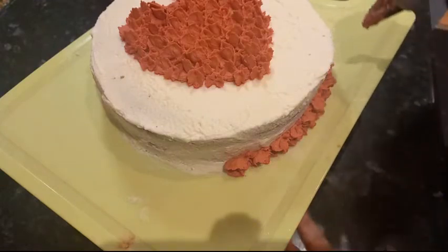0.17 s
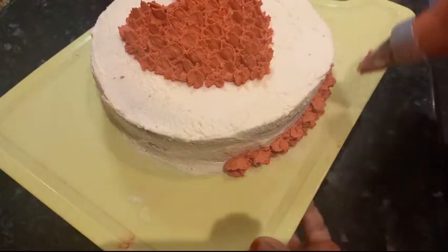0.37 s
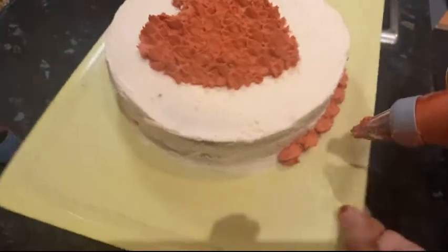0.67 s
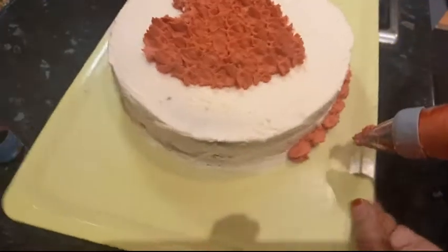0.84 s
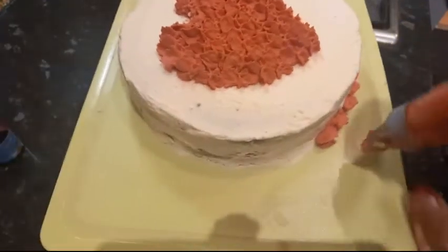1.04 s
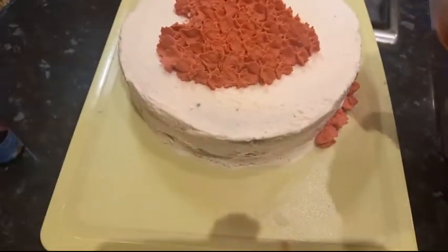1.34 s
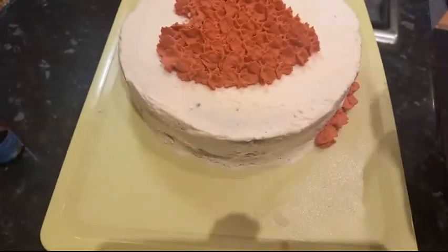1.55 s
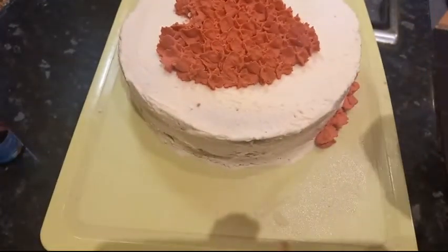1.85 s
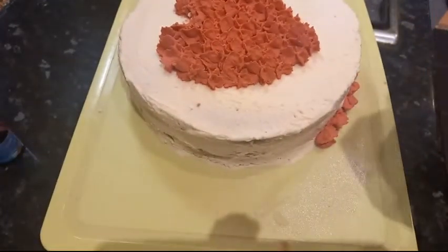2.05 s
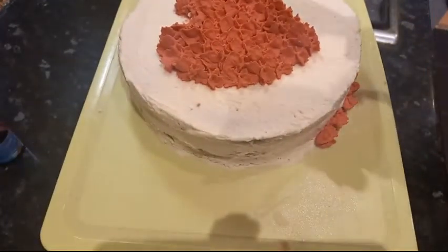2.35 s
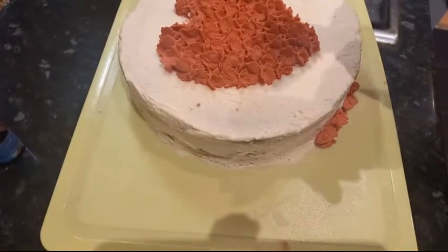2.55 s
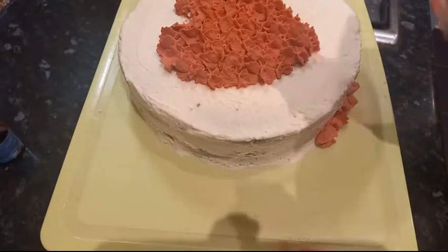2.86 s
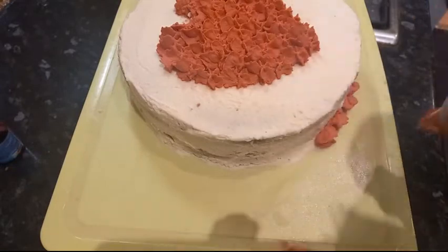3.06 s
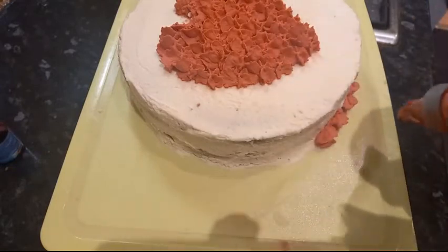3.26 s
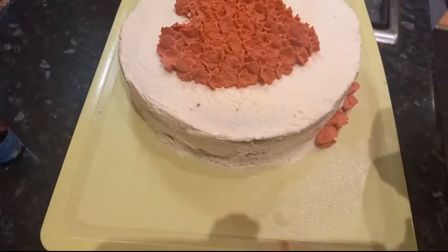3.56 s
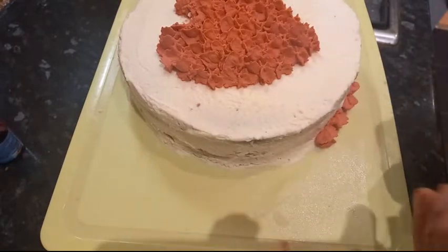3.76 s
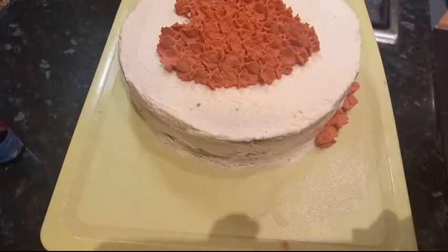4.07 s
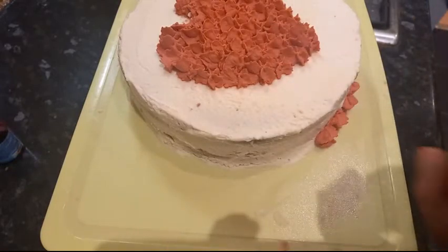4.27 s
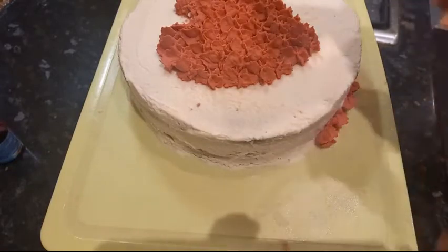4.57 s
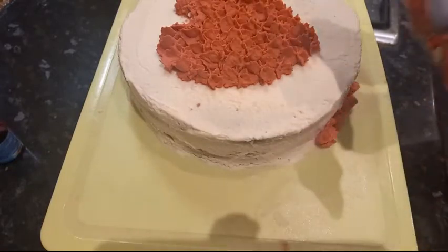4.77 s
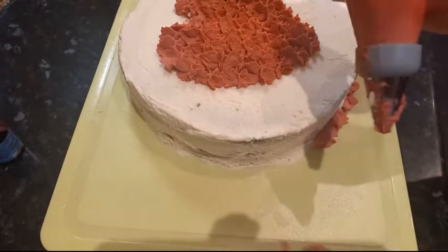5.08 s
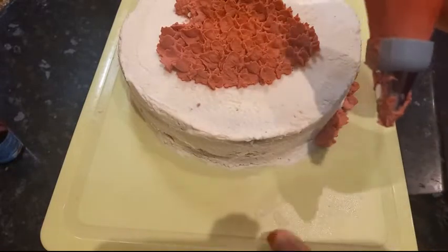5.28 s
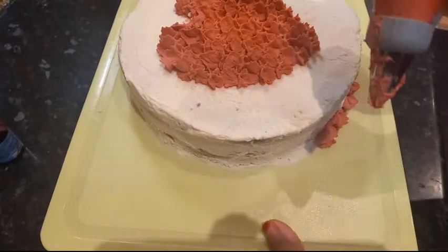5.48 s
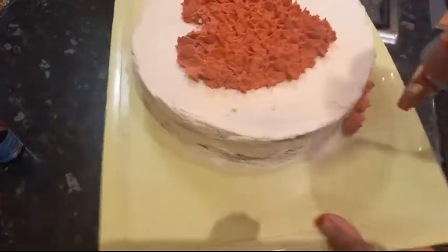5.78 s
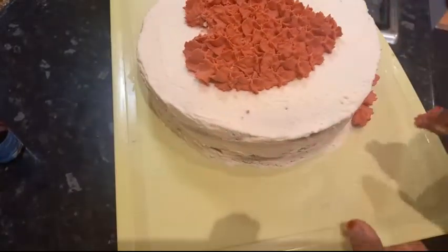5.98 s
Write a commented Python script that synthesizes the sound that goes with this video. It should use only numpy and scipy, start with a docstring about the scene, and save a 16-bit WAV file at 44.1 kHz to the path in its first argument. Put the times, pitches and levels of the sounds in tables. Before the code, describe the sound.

A quiet small kitchen, heard close in stereo: faint unsteady low appliance hum, soft room air and hiss. From 0.2 s a cake tray ticks and scrapes on a stone counter, with the strongest hollow knocks at 0.5-0.65 s and a gritty slide fading by 0.9 s. A dull double thud lands at 1.05 s. Thin plastic film then crinkles, mostly to the right: a dense crackling burst at 1.3-1.6 s trails into scattered ticks to 1.8 s; a short burst at 2.1-2.25 s holds one very sharp snap. Sparse faint ticks follow. The fullest, loudest crumpling runs 3.3-3.55 s, with smaller rustles at 3.7-4.0 s and another crisp cluster at 4.08-4.3 s. Then near silence, with a faint brush around 4.6 s. At 5.25-5.35 s the tray knocks several times, one plastic snap clicks at 5.63 s, and a soft slide dies by 5.8 s, leaving hum.

```python
"""Plastic snaps and crackles, mostly to the right, as a hand twists and squeezes a thin piping bag.
A cake tray knocks and slides on a stone counter; a small kitchen answers while an appliance hums.
Snaps are shaped noise bursts, crackle is thousands of short rings, knocks are ringing modes, and
slides are noise through resonances. The hum is a wandering sine; the rest of the bed is shaped noise."""
import sys
import numpy as np
from scipy import signal
from scipy.fft import rfft, irfft, next_fast_len
from scipy.io import wavfile
from scipy.ndimage import map_coordinates

SR = 44100
rng = np.random.default_rng(int(sys.argv[2]) if len(sys.argv) > 2 else 0)


def generate_wav(sig):
    """Save sig (samples, or channels by samples) to the path in sys.argv[1] as 16-bit PCM at SR."""
    pcm = np.round(np.clip(np.atleast_2d(sig).T, -1, 1) * 32767).astype(np.int16)
    wavfile.write(sys.argv[1], SR, pcm)


def decibels_to_gain(level_db):
    """Convert a level in decibels to a linear amplitude gain (20 dB per decade)."""
    exponent = np.asarray(level_db, float) / 20
    return 10 ** exponent


N = 270774
TIME = np.arange(N) / SR  # seconds

# Level near 81 Hz: the appliance hum, plus the low thud of tray knocks near 0.65 and 1.08 seconds.
# Each row: time in seconds, level in dB before a random waver.
HUM_LEVEL = [(0.0, -83), (0.08, -68.5), (0.31, -76), (0.46, -62), (0.6, -68), (0.65, -57), (0.84, -75.5),
             (1.08, -55), (1.13, -70.5), (1.55, -61.5), (2.02, -78), (2.19, -66), (2.53, -80), (2.62, -64),
             (2.7, -78.5), (3.2, -62), (3.37, -76.5), (3.5, -57), (3.61, -75), (4.34, -56), (5.11, -63.5),
             (5.16, -78), (5.27, -62.5), (5.45, -76.5), (6.05, -65.5), (6.14, -69)]
# Colour of the appliance's low rumble. Each row: frequency in Hz, relative density in dB per Hz.
RUMBLE_COLOUR = [(25, -40), (52, -27.5), (88, -3.5), (124, -11.5), (161, -7), (175, -23), (190, -30),
                 (250, -62), (420, -120)]
# Colour of the deep waver under the hum. Each row: frequency in Hz, relative density in dB per Hz.
WAVER_COLOUR = [(20, -37.5), (38, -18.5), (47, -5.5), (52, 3), (60, -5.5), (75, -6.5), (90, -44),
                (300, -48.5)]
# Colour of the faint whine. Each row: frequency in Hz, relative density in dB per Hz.
WHINE_COLOUR = [(900, -41), (985, 1.0), (1070, -47.0)]
# Colour of the room tone. Each row: frequency in Hz, relative density in dB per Hz.
ROOM_COLOUR = [(100, -23), (170, -8), (206, -5.5), (348, -4.5), (736, -13), (973, -12), (1120, -18),
               (2290, -19.5), (3360, -27), (4520, -33.5), (5900, -32.5), (6700, -23.5), (7360, -38),
               (11000, -38.5), (14300, -59), (22000, -120)]
# Colour of the microphone's own hiss. Each row: frequency in Hz, relative density in dB per Hz.
MIC_HISS_COLOUR = [(3000, -33), (8000, -18.5), (11300, -4.5), (12500, 3), (15200, -4.5), (16000, -4)]
# Stereo likeness of room tone and microphone hiss. Each row: frequency in Hz, correlation from -1 to 1.
ROOM_LIKENESS = [(60, 0.75), (180, 0.59), (550, -0.2), (1650, 0.11), (4970, -0.62), (15000, 1)]
# How fast the kitchen's answer dies. Each row: frequency in Hz, time to fall 60 dB in seconds.
KITCHEN_DECAY = [(200, 0.33), (2000, 0.15), (6000, 0.099), (14000, 0.11)]

# The tray meets the counter. Each row: time in seconds, nominal level in dB, then the relative
# strength in dB of thump, knock and sharpness.
KNOCKS = [(0.207, -43.5, -14, -24, -31), (0.342, -45.5, -22, -28, -19), (0.414, -49.5, -16.5, -19, 0),
          (0.497, -49, -16, 2.5, -9), (0.522, -33.5, -21, -5, -33), (0.6, -23.5, -19, -15, -12),
          (0.617, -47.5, -19, 6, -11), (0.633, -43, 3, -13, -4), (0.639, -35, 0.5, -9, -29),
          (1.046, -29.5, -13.5, -9.5, -34), (1.057, -31, -4, -17, -45.5), (1.086, -42.5, -9, -13, -33),
          (2.659, -61, -9.5, -7, -19), (4.511, -65, 2.5, -0.5, 2), (5.001, -62.5, -17, -0.5, -8),
          (5.242, -31.5, -21.5, -9.5, -10), (5.261, -36, -14.5, -13.5, -13.5), (5.278, -41.5, -15, -5, -9),
          (5.312, -32.5, -23, -12.5, -14), (5.335, -45.5, -13, -10, -16)]
# The tray's ringing modes. Each row: centre frequency in Hz, base level in dB, 60 dB decay in seconds.
TRAY_MODES = [(96, 1.5, 0.22), (152, 6, 0.051), (233, 4.5, 0.075), (289, 2.5, 0.056), (365, -4.5, 0.09),
              (415.2, -1.5, .09), (536.7, 0, 0.12), (626, -5, 0.074), (717, -19, 0.11), (916, -4.5, 0.027),
              (1183, -14, 0.081), (1395, -25.5, 0.055), (1626, -23, 0.069), (1770, -19.5, 0.059),
              (1894, -14.5, 0.087), (2362, -0.5, 0.029), (2470, -24, 0.24), (2670, -13, 0.062),
              (3130, -21.5, 0.15), (3520, -28, 0.21), (4080, -25.5, 0.16)]
RATTLE_DB, RATTLE_GROWS = -9.5, 0.59  # base rattle; dB gained per dB of sharpness
# The tray slides. Each row: start in seconds, end in seconds, rasp at full speed in dB,
# scrape relative to rasp in dB.
SLIDES = [(0.287, .47, -70, 14), (0.361, 0.605, -56.5, 1.5), (0.638, 0.705, -71, 14),
          (0.677, 0.934, -63.5, 6), (4.567, 4.744, -72.5, -4), (5.33, 5.431, -77.5, 10),
          (5.453, 5.62, -74.5, 9.5), (5.513, 5.819, -65.5, 5)]
# Low resonances of the scrape. Each row: frequency in Hz, width in Hz, relative level in dB.
SCRAPE_RESONANCES = [(228, 47, -18), (367, 33, -4.5), (437, 33, -3), (531, 48, -0.5), (675, 79, -9.5),
                     (900, 340, -24.5)]
# High resonances of the rasp, applied twice. Each row: frequency in Hz, width in Hz and relative
# level in dB for a single pass.
RASP_RESONANCES = [(1930, 170, -4), (2295, 150, 0), (2560, 260, -3.5)]
# Colour of the sliding hiss. Each row: frequency in Hz, relative level in dB.
SLIDE_HISS_COLOUR = [(1000, -7), (2800, -13), (3500, 3), (4000, -2), (4350, 3), (4800, 0.5), (5600, 2),
                     (6900, 0), (10600, -15), (16000, -29.5)]
SPEED_GROWS, SLIDE_HISS_DB = 1.15, -3  # rasp amplitude as a power of speed; hiss against rasp

# Grips on the bag. Each row: time of most force in seconds, nominal crackle level in dB, rise in
# seconds per 20 dB, fall in seconds per 20 dB, fullness of the fold in dB.
GRIPS = [(1.125, -63, .13, 0.16, -16), (1.347, -50, 0.05, .1, -2), (1.418, -39, 0.0474, 0.1016, 1),
         (1.49, -54, 0.09, 0.03, -6), (1.53, -48, 0.07, 0.0433, -13.5), (1.69, -56, 0.2, .08, -11),
         (1.6, -62, 0.1, 0.19, 0), (1.8, -71, 0.13, 0.4, -10), (2.04, -64, 0.11, 0.22, -10),
         (2.125, -47, 0.0624, 0.1652, 0), (2.19, -42, .06, 0.06, -2), (2.235, -49, 0.08, 0.0661, -4),
         (2.42, -70, 0.17, .2, -5.5), (2.535, -66, 0.13, .13, -7.5), (2.96, -73, 0.28, .13, -8),
         (3.32, -45, 0.04, 0.31, 0), (3.37, -43, 0.075, 0.1028, 1.5), (3.416, -40, .05, .06, 1.5),
         (3.518, -46, 0.0847, 0.0564, 7), (3.6, -62, 0, 0.01, -3), (3.74, -52, 0.09, 0.1935, -4),
         (3.815, -46, 0.0475, 0.2052, -6), (3.87, -49, 0.0871, 0.1575, 5.5), (4.0, -63, 0.05, .12, 8),
         (4.09, -60, 0.03, 0.1, -6), (4.175, -59, 0.08, 0.12, -10), (4.232, -45.5, 0.06, 0.1047, 2),
         (4.284, -43, 0.0724, 0.0568, 4), (4.36, -74, 0.1, .2, -13), (4.52, -76, 0.04, 0.15, 8),
         (4.633, -67, .15, 0.03, 9), (5.02, -79, 0.04, 0.06, 12), (5.67, -68, .08, 0.03, 0.5)]
FULL_GROWS, HARD_GRIP_DB = 0.3, -44.5  # fullness gained per dB of grip; level of a hard grip
# Where the hands hold the bag. Each row: time in seconds, left over right in dB, relative brightness
# in dB as the hands let treble through.
BAG_SIDE = [(0.9, -1, -3), (1.345, -3.5, -8), (1.42, -1, 5), (1.55, -2.5, -6), (1.7, -4, 1.5),
            (2.0, -6, -6), (2.19, -2, 7), (2.4, -0.5, -10), (2.6, 0, -11), (3.2, -6, -4.5), (3.33, -4, 0.5),
            (3.5, -3, -3), (3.75, -2, -5), (3.82, -3.5, -1.5), (4.0, -6, -6), (4.3, -3.5, -1.5),
            (4.52, 2.5, -12.5), (5.0, 2, -2.5), (5.7, 3.5, 9)]
# Creases that stand out, loud or alone. Each row: time in seconds, nominal peak in dB, lows and
# highs relative to the peak in dB, left over right in dB.
CLEAR_CREASES = [(0.9971, -54, -21.5, -20, -7.5), (1.0907, -46.5, -23, -16, 1),
                 (1.1263, -47.5, -28, -15, -4.0), (1.3319, -38.5, -16, -15, -5),
                 (1.3487, -34, -25.5, -17, -2.5), (1.3798, -34, -19, -4.5, -3.5),
                 (1.398, -25, -27, -12, -4.0), (1.4054, -28, -21.5, -11, -3), (1.418, -26, -22, -12, -1.0),
                 (1.4224, -26, -21, -10, -0.5), (1.4282, -22, -28, -14.5, -1.0),
                 (1.4477, -27, -20, -17, -2.0), (1.452, -31, -23, -14, -1.0), (1.5153, -23, -37, -16.5, -2),
                 (1.5329, -29, -34, -13, -4), (1.5634, -25.5, -28, -15, -9),
                 (1.6234, -35, -34, -15.5, -1.0), (1.6561, -41, -36, -16, -6.5),
                 (1.6646, -38, -30, -19, -3.0), (1.6797, -41, -26, -6.5, -7.5),
                 (1.6921, -30.5, -33, -16, -10), (1.7191, -32.5, -30.5, -18.5, -9.5),
                 (1.7404, -43, -20, -3, -5.0), (1.7651, -27.5, -48, -19, -8.5),
                 (1.8375, -46.5, -32, -17.5, -11), (1.8637, -57, -25, -6, -5),
                 (1.8901, -45, -38, -13.5, -12), (1.9954, -48.5, -38, -26, -5),
                 (2.063, -39.5, -21.5, -14.5, -5), (2.0924, -41, -24.5, -8, -4.0),
                 (2.11, -34, -22, -14, -3.0), (2.1367, -33, -24, -10, -3.0), (2.155, -30, -20.5, 5, -1.5),
                 (2.1873, -15, -36, -9.5, -11.0), (2.1899, -22, -30.5, -6, 0),
                 (2.2296, -31, -20.5, -13.5, 3), (2.362, -52.5, -12, -19, -0.5),
                 (2.406, -49.5, -20, -18, 1.0), (2.4183, -43, -26, -24.5, 6.5),
                 (2.5133, -50, -15, -22, 0.0), (2.5336, -53, -21, -21.5, -1), (2.615, -54, -10, -21.5, -2),
                 (2.7584, -60, -15.5, -13.5, -0.5), (2.8818, -52.5, -20, -20, 2), (2.93, -57, -20, -19, -2),
                 (3.2176, -54.5, -25, -23, -6.0), (3.25, -48, -13.5, -16, -5.5),
                 (3.3119, -20, -29, -15.5, -5.5), (3.3342, -30.5, -18, -15, -4.0),
                 (3.3597, -27.5, -21, -12.5, -3.0), (3.3644, -25, -22.5, -12.5, -4.0),
                 (3.3728, -22, -31.5, -18, -1.5), (3.3814, -26.5, -22, -14.5, -4.0),
                 (3.4022, -21, -24, -17, -7.5), (3.4064, -21.5, -19, -15, -3.0),
                 (3.4197, -16, -20.5, -17, -5.0), (3.4401, -21, -27, -17, -5.5),
                 (3.4594, -31, -14, -13, -4), (3.4855, -25.5, -21, -17, -6.5),
                 (3.5034, -22, -23, -25, -6.5), (3.5127, -30.5, -15, -12, -5),
                 (3.5215, -23.5, -28, -16, -2.5), (3.5607, -34.5, -28, -17, -2.0),
                 (3.5848, -30.5, -33, -19.5, -6), (3.6202, -48, -27, -15, -1), (3.6338, -46, -31, -17, -1),
                 (3.6825, -44.5, -23.5, -16, -2.0), (3.7179, -32.5, -27.5, -25, 1.0),
                 (3.7264, -37.5, -18.5, -18, 1.0), (3.7378, -37.5, -22, -17, -1.0),
                 (3.7702, -33, -18.5, -7, -1.5), (3.8018, -19, -33.5, -18, -3.0),
                 (3.8074, -29, -26, -13, -2), (3.8194, -29, -25, -17.5, -0.5),
                 (3.8364, -30.5, -20, -17, -4.5), (3.8528, -32, -19, -19, -5.5),
                 (3.894, -35, -25, -10, -9.0), (3.904, -29.5, -19.5, -14, -7.5),
                 (3.918, -34, -20, -16, -5.5), (3.9378, -36, -21, -21, -7.0), (3.9814, -33, -31, -26, -8),
                 (4.0015, -39.5, -25, -21, -6.5), (4.051, -43.5, -20, -19, -8),
                 (4.0617, -44.5, -13, 3, -4.5), (4.079, -25, -23, -14, -9.5),
                 (4.114, -31.5, -40, -15.5, -5), (4.137, -42.5, -18, -7, -9),
                 (4.1627, -26, -29.5, -21, -11), (4.1766, -25, -32, -22.5, -7.0),
                 (4.205, -36, -22, -2, -6.5), (4.2133, -25.5, -26, -12, -8.0),
                 (4.2174, -25.5, -27, -19, -2), (4.2284, -23.5, -24, -15.5, -7),
                 (4.2482, -28, -21, -15, -4), (4.262, -27, -17, -11, -5.0), (4.2758, -22.5, -22, -15, -1.0),
                 (4.2964, -29, -20, -20, -2.5), (4.3044, -33, -22, -12, -1.5), (4.4767, -58, -3, -11, -0.5),
                 (4.5129, -47.5, -12, -38, -0.5), (4.6153, -55, -1, -19.5, 2.0),
                 (4.9294, -71.5, -1, -8, 0.5), (4.999, -62.5, -6, -12.5, 2), (5.0243, -57, -15, -19, 4),
                 (5.4735, -60.5, -5, -23.5, 8), (5.6337, -33.5, -33, -22, 0)]
# Random creases: peak over the grip level and its scatter in dB; how their number follows the grip.
RANDOM_OVER_DB, RANDOM_SPREAD_DB, RANDOM_CROWD = 11, 3.5, .33
RANDOM_LOWS_DB, RANDOM_HIGHS_DB, SNAP_MIDS_DB = -21, -17.5, -18  # base band levels of a snap
# Colour of the bag's film. Each row: frequency in Hz, relative level in dB.
FILM_COLOUR = [(120, -49), (200, -8.5), (365, -14), (526, -8.5), (680, -15.5), (944, -7), (1520, -5),
               (3210, 2), (3510, -1), (3920, 1.5), (4790, -1.5), (6300, 3), (9250, -6), (12400, -2.5),
               (15700, -7.5)]
# The camera's body shades the left port. Each row: frequency in Hz, left over right in dB.
BODY_SHADE = [(1500, -2.5), (4500, 1), (8000, 1), (13000, -2)]
TOP_HZ = 15850  # band limit of the pickup


def unit(x):
    """Brings a sound to an rms of 1."""
    return x / np.sqrt(np.mean(x ** 2) + 1e-20)


def along(points, hz):
    """Reads a frequency curve on a log axis."""
    f, value = np.transpose(points)
    return np.interp(np.log(hz + 1), np.log(f + 1), value)


def curves(rows, at=TIME):
    """Reads each column after the time at the given moments."""
    s, *columns = np.transpose(rows)
    return [np.interp(at, s, column) for column in columns]


def wobble(rate):
    """Draws a smooth random curve with rate knots a second."""
    knots = rng.standard_normal(int(N * rate / SR) + 4)
    return map_coordinates(knots, [TIME * rate])


def filtered(x, response):
    """Shapes a sound by a complex response of frequency."""
    m = next_fast_len(N + SR // 2)
    hz = np.fft.rfftfreq(m, 1 / SR)
    return irfft(rfft(x, m) * response(hz), m)[..., :N]


def colour(points):
    """Turns a dB curve into a response."""
    return lambda f: decibels_to_gain(along(points, f))


def resonant(peaks):
    """Builds the causal response of resonances with alternating polarity."""
    def response(f):
        total = 0
        for k, (centre, width, db) in enumerate(peaks):
            damping = 1j * f * width
            total = total + (-1) ** k * decibels_to_gain(db) * damping / (centre * centre - f * f + damping)
        return total
    return response


def placed(waves, s, pan_db, lag):
    """Sums short waves at their times; the left port hears them lag samples late."""
    start = np.round(s * SR).astype(int)[:, None] + np.arange(waves.shape[1])
    late = np.round(lag).astype(int)[:, None]
    to_left = waves * decibels_to_gain(pan_db / 2)[:, None]
    to_right = waves * decibels_to_gain(-pan_db / 2)[:, None]
    left = np.bincount((start + late).ravel(), to_left.ravel(), N + SR)
    right = np.bincount(start.ravel(), to_right.ravel(), N + SR)
    return np.array([left[:N], right[:N]])


def pair(spectrum, likeness):
    """Mixes mid and side noise into stereo of rms 1 with a set correlation."""
    def mid_side(hz):
        angle = np.arccos(np.clip(along(likeness, hz), -1, 1)) / 2
        return decibels_to_gain(along(spectrum, hz)) * [np.cos(angle), np.sin(angle)]
    mid, side = filtered(rng.standard_normal((2, N)), mid_side)
    return unit(np.array([mid + side, mid - side]))


def room_tone():
    """Room air and microphone hiss as steady shaped noise, with the air drifting gently in level."""
    air = decibels_to_gain(-75 + .6 * wobble(1.4)) * pair(ROOM_COLOUR, ROOM_LIKENESS)
    return air + decibels_to_gain(-83.0) * pair(MIC_HISS_COLOUR, ROOM_LIKENESS)


def whine():
    """A faint narrow band of noise near 985 Hz that flutters in level."""
    return decibels_to_gain(-92 + 2.5 * wobble(21)) * pair(WHINE_COLOUR, [(985, .6)])


def appliance():
    """A sine wandering around 81.5 Hz, hum and low knock thuds alike, with wavering bands of low noise."""
    hum_db, = curves(HUM_LEVEL)
    turns = np.cumsum(81.5 + 1.186 * wobble(6)) / SR
    hum = np.sqrt(2) * decibels_to_gain(hum_db + wobble(6.5)) * np.sin(2 * np.pi * turns)
    waver = decibels_to_gain(-68 + 2.2 * wobble(4.96)) * pair(WAVER_COLOUR, [(50, 0.91)])
    rumble = decibels_to_gain(-69 + 1.5 * wobble(5)) * pair(RUMBLE_COLOUR, [(100, 0.88)])
    return hum * decibels_to_gain([[.4], [-.4]]) + waver + rumble


def kitchen(x, delay=70, count=24):
    """Counter and walls answer each port with noise tails whose frequencies die at their own speeds."""
    noise = rng.standard_normal((count, 2, SR // 3))
    hz, t, z = signal.stft(noise, SR, nperseg=128)
    decay = decibels_to_gain(-60 * t / along(KITCHEN_DECAY, hz)[:, None])
    tails = signal.istft(z * decay, SR, nperseg=128)[1]
    age = np.arange(tails.shape[-1]) / SR
    tails = tails * (1 + 0.5 * decibels_to_gain(-60 * age / 0.025))  # the counter's early answer is the strongest
    tails = tails / np.linalg.norm(tails, axis=-1, keepdims=True)
    out, step = np.zeros((2, N + SR)), N // count + 1
    # each equal stretch gets a fresh random tail, so the room's answer stays wide; delay is in samples
    for k, tail in enumerate(tails):
        answer = signal.fftconvolve(x[:, k * step:(k + 1) * step], tail, axes=1)
        out[:, k * step + delay:][:, :answer.shape[1]] += answer
    return out[:, :N]


def slide():
    """Grit under the moving tray drives its resonances; the low ones reach the right port best."""
    grit = rng.standard_normal((2, 2, N)) * decibels_to_gain(2.4 * wobble(40) + 1.14 * wobble(180))
    low_grit, high_grit = grit
    scrape = unit(filtered(low_grit[0] + 1.2 * low_grit, resonant(SCRAPE_RESONANCES)))
    scrape = scrape * decibels_to_gain([[-5], [4]])
    rasp = unit(filtered(high_grit, lambda f: resonant(RASP_RESONANCES)(f) ** 2))
    hiss = unit(filtered(high_grit, colour(SLIDE_HISS_COLOUR)))
    scrape_power, rasp_power = np.zeros((2, N))
    for start, end, rasp_db, scrape_db in SLIDES:
        speed = np.sin(np.pi * np.clip((TIME - start) / (end - start), 0, 1))
        scrape_power += decibels_to_gain(2 * (rasp_db + scrape_db)) * speed ** 2
        rasp_power += decibels_to_gain(2 * rasp_db) * np.abs(speed) ** (2 * SPEED_GROWS)
    return np.sqrt(scrape_power) * scrape + np.sqrt(rasp_power) * (rasp + decibels_to_gain(SLIDE_HISS_DB) * hiss)


def chatter_band(noise, order, low_hz, high_hz):
    """Keeps one band of the contact noise."""
    sos = signal.butter(order, [low_hz, high_hz], btype="band", fs=SR, output="sos")
    return signal.sosfilt(sos, noise)


def knocks():
    """Each contact rings the tray's modes anew: hard ones wake the highs, flat ones the lows."""
    s, db, thump, knock, sharp = np.transpose(KNOCKS)
    rattle_db = RATTLE_DB + RATTLE_GROWS * sharp
    hz, level, t60 = np.transpose(TRAY_MODES)
    t = np.arange(SR // 4) / SR
    weight = np.array([along([(150, 2 * a - 1), (240, a + 4), (340, 0.0053), (700, 0), (950, b + 12),
                              (1760, b + 13), (1950, c + 10), (3300, c + 10), (4200, d + 16)], hz)
                       for a, b, c, d in zip(thump, knock, sharp, rattle_db)])
    chance = rng.standard_normal((len(s), 3, len(hz)))
    # each contact's modes are detuned a little at random
    detuned = hz * (1 + 0.0299 * chance[:, 0])
    phase = 2 * np.pi * detuned[..., None] * t + 1.07 * chance[:, 1, :, None]
    fade = decibels_to_gain(-60 * t / t60[:, None]) * (1 - np.exp(-t / 0.00065))
    strength = decibels_to_gain(level + weight + 2 * chance[:, 2])
    body = np.sum(strength[..., None] * fade * np.sin(phase), axis=1)
    chatter_fade = decibels_to_gain(-60 * t / 0.015) + 0.39 * decibels_to_gain(-60 * t / 0.25)
    chatter = rng.standard_normal((2, len(s), len(t))) * chatter_fade
    dull = chatter_band(chatter[0], 2, 800, 2200) * decibels_to_gain(knock[:, None] + 5)
    crisp = chatter_band(chatter[1], 3, 3300, 8000) * decibels_to_gain(rattle_db[:, None] + 8.0)
    contacts = (body + dull + crisp) * decibels_to_gain(db - 8.5)[:, None]
    return placed(contacts, s + 0.00106, np.full(len(s), -4), np.zeros(len(s)))


def grip(at):
    """Each grip builds and lets go exponentially; a harder one sounds fuller. Gives level and fullness."""
    s, db, rise, fall, full = np.transpose(GRIPS)[..., None]
    power = decibels_to_gain(2 * (db + 20 * np.minimum((at - s) / rise, (s - at) / fall))) + 1e-30
    force_db = 10 * np.log10(power.sum(0))
    mean_full = (power * full).sum(0) / power.sum(0)
    return force_db, mean_full + FULL_GROWS * np.maximum(force_db - HARD_GRIP_DB, -40)


def crackle(count=38000, cycles=1.423, spread_db=5.5, clump=.5, lag=9):
    """Thousands of tiny folds, each a short ring at its own pitch, coming in clumps."""
    busy = np.cumsum(np.exp(clump * (wobble(30) + wobble(90) + wobble(250))))
    u = rng.random((count, 4))
    s = np.interp(u[:, 0], busy / busy[-1], TIME)
    hz = 250 + 15750 * u[:, 1] ** 1.497
    (db, full), (pan, bright) = grip(s), curves(BAG_SIDE, s)
    octave = np.log2(hz / 5000)
    treble = np.clip(octave - .4, 0, .7) * 0.91 * (bright + 1)
    lows = np.clip(-octave / 2.3, 0, 1.05) * (full + 6)
    size = decibels_to_gain(spread_db * rng.standard_normal(count) + treble + lows) * (hz / 5000) ** 0.75
    t = np.arange(128) / SR
    turns = hz[:, None] * t
    envelope = turns * np.exp(-turns / cycles * 2) * np.cos(np.pi / 2 * t / t[-1])
    rings = np.sin(2 * np.pi * turns) * envelope
    level = size * decibels_to_gain(db + 11.5)
    return placed(rings * level[:, None], s, pan + 8 * (u[:, 2] - .5), lag + 8 * (u[:, 3] - .5))


def random_creases(count=380):
    """Rows like CLEAR_CREASES for the random folds between them, more and louder in a hard grip."""
    grid = TIME[::64]
    busy = np.cumsum(decibels_to_gain(RANDOM_CROWD * grip(grid)[0]))
    s = np.interp((np.arange(count) + rng.random(count)) / count, busy / busy[-1], grid)
    (force_db, full), (pan, bright) = grip(s), curves(BAG_SIDE, s)
    chance = rng.standard_normal((count, 4))
    peak = force_db + RANDOM_OVER_DB + RANDOM_SPREAD_DB * chance[:, 0]
    lows = RANDOM_LOWS_DB + full + 6 * chance[:, 1]
    highs = RANDOM_HIGHS_DB + bright + 6 * chance[:, 2]
    return np.transpose([s, peak, lows, highs, pan - 3 + 5 * chance[:, 3]])


def snaps(rise=0.00022, fall=0.0004, lag=8, size=512):
    """A crease flips: a noise burst of about a millisecond, each with its own colour."""
    s, db, lows, highs, pan = np.vstack([CLEAR_CREASES, random_creases()]).T
    t = (np.arange(size) - 128) / SR  # the envelope peaks at sample 128
    burst = rfft(rng.standard_normal((len(s), size)) * np.exp(np.minimum(t / rise, -t / fall)))
    hz = np.fft.rfftfreq(size, 1 / SR)
    mids = SNAP_MIDS_DB
    bands = [along([(400, a - 7), (1800, a), (3300, mids + .25 * (a - RANDOM_LOWS_DB)), (5500, mids),
                    (7500, mids), (11000, c), (15000, c + 2)], hz) for a, c in zip(lows, highs)]
    even = np.abs(burst) ** -.3  # one fold radiates all pitches at once, without deep holes
    burst = irfft(burst * even * decibels_to_gain(bands + along(FILM_COLOUR, hz)))
    burst = burst / np.abs(burst).max(axis=1, keepdims=True) * decibels_to_gain(db + 2)[:, None]
    return placed(burst, s - 70 / SR, pan, lag + rng.uniform(-3, 3, len(s)))


def piping_bag():
    """Film colours the folds, and the camera's body shades them towards one port."""
    bag = snaps() + filtered(crackle(), colour(FILM_COLOUR))
    return filtered(bag, lambda f: decibels_to_gain(along(BODY_SHADE, f) / 2 * [[1], [-1]]))


def scene():
    """Bag and tray sound directly and through the kitchen, over the appliance and room bed."""
    bag = piping_bag()
    tray = knocks() + slide()
    bed = appliance() + whine() + room_tone()
    return bag + tray + decibels_to_gain(-5.5) * kitchen(bag) + decibels_to_gain(-10) * kitchen(tray) + bed


def band_limit(x):
    """A steep low-pass at the top of the band."""
    return signal.sosfilt(signal.butter(12, 16820, fs=SR, output="sos"), x)


def record(dry):
    """The camera keeps nothing above its band limit."""
    mix = filtered(dry, lambda f: f < TOP_HZ)
    return band_limit(mix)


dry = scene()
out = record(dry)
generate_wav(out)
```